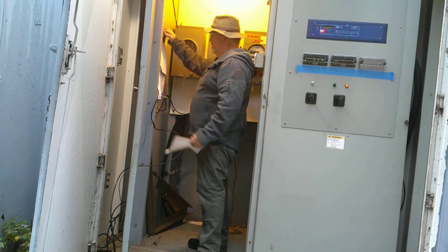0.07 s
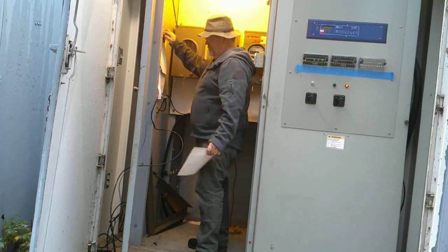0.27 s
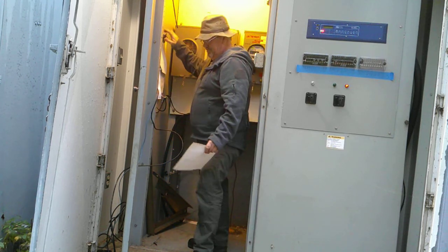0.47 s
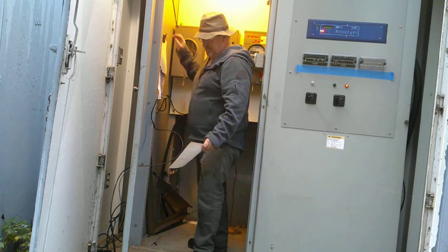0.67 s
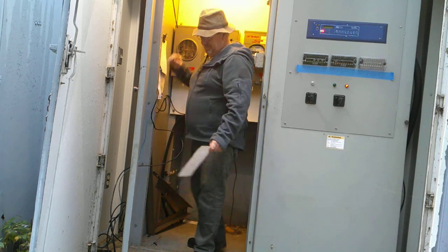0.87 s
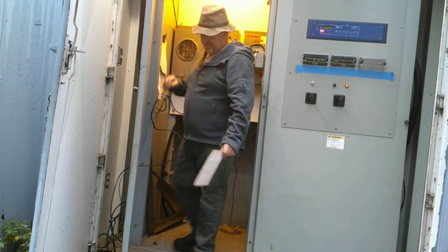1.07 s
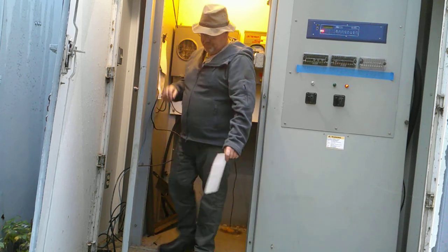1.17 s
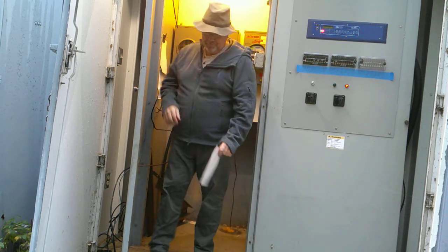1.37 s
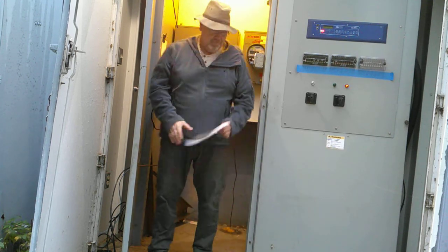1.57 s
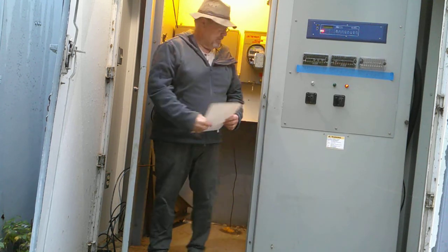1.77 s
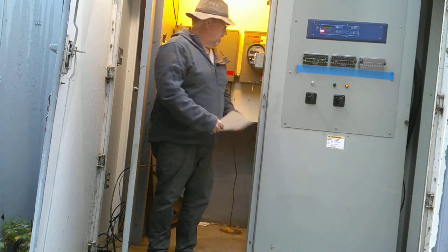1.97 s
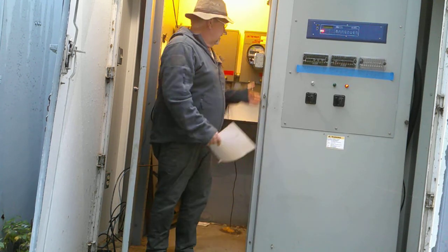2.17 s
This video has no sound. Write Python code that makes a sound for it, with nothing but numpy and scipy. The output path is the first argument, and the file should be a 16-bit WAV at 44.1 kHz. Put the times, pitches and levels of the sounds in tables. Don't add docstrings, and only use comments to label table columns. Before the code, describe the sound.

An even machine whirr with a faint mains buzz fills a hard-walled equipment room. Sharp papery snaps cluster in the first second, followed by grainy rustles and foot scuffs near a muffled-top microphone in the doorway.

```python
import sys
import numpy as np
from scipy import signal
from scipy.io import wavfile

SR = 44100
rng = np.random.default_rng(int(sys.argv[2]) if len(sys.argv) > 2 else 0)


def gain_from_db(level_db):
    decades = np.asarray(level_db, float) / 20
    return 10 ** decades


def file_out(sig):
    cols = np.atleast_2d(sig).T
    lim = np.clip(cols, -1, 1)
    pcm = np.round(lim * 32767).astype(np.int16)
    wavfile.write(sys.argv[1], SR, pcm)


N = 97284


def rms_one(x):
    return x / np.sqrt(np.mean(x ** 2) + 1e-20)


def drift(rate_hz):
    r = np.exp(-2 * np.pi * rate_hz / SR)
    noise = rng.standard_normal(N + SR)
    return rms_one(signal.lfilter([1], [1, -2 * r, r * r], noise)[SR:])


def band(low_hz, high_hz):
    sos = signal.butter(2, [low_hz, high_hz], "band", fs=SR, output="sos")
    return rms_one(signal.sosfilt(sos, rng.standard_normal(N + 4096))[4096:])


def peak(x, hz, width_hz, db):
    a, w = gain_from_db(db / 2), 2 * np.pi * hz / SR
    k = np.sin(w) * width_hz / hz / 2
    over = [1 + k * a, -2 * np.cos(w), 1 - k * a]
    under = [1 + k / a, -2 * np.cos(w), 1 - k / a]
    return signal.lfilter(over, under, x)


# (frequency [Hz], density [dB per Hz])
RUSH_COLOUR = [(25, -18.5), (90, -15.5), (200, -8), (450, -4), (900, 1), (2500, -2), (4000, -6.5),
               (9000, -15)]


def water_and_air_rush():
    level_db, patchy_db = -34.5, 1
    hz, density_db = np.transpose(RUSH_COLOUR)
    edges = 20 * 2 ** (np.arange(28) / 3)
    flicker = [drift(11.0) for _ in range(4)]
    total = np.zeros(N)
    for k, (low, high) in enumerate(zip(edges, edges[1:])):
        colour_db = np.interp(np.log(low * high) / 2, np.log(hz), density_db)
        gain = gain_from_db(colour_db + patchy_db * flicker[k % 4])
        total += np.sqrt(high - low) * band(low, high) * gain
    return gain_from_db(level_db) * rms_one(total)


def rotor_whine():
    centre_hz, width_hz = 458, 18
    return gain_from_db(-58) * band(centre_hz - width_hz / 2, centre_hz + width_hz / 2)


# (multiple of the hum [1], level [dB rms])
HUM_TONES = [(1, -61), (2, -54), (3, -54), (5, -44.5), (6, -46), (7, -52), (8, -44), (9, -51.5), (10, -54),
             (11, -58), (12, -60)]


def core_hum():
    hum_hz, waver_db = 120.02, 0.3
    spread_rad = 1.74
    t = np.arange(N) / SR
    total = np.zeros(N)
    for multiple, db in HUM_TONES:
        level = np.sqrt(2) * gain_from_db(db + waver_db * drift(6.0))
        phase = 2 * np.pi * hum_hz * round(multiple) * t + spread_rad * round(multiple) ** 2
        total += level * np.sin(phase)
    return total


# (start [s], length [s], level [dB], centre [Hz], band edge over centre [ratio])
SCUFF_EVENTS = [(0.325, .05, -38, 1400, 1.25), (0.335, .08, -39, 2650, 1.1), (1.82, .17, -39, 2300, 1.5),
                (1.915, .055, -44, 6200, 1.12), (0.32, .11, -48, 6300, 1.2), (0.34, .1, -46, 1000, 1.3),
                (0.58, .04, -42, 1500, 1.3), (0.86, .14, -50, 6300, 1.2), (1.14, .1, -43, 1500, 1.5),
                (1.44, .1, -44, 1100, 1.4), (1.63, .14, -42, 2200, 1.4), (1.74, .12, -40, 1450, 1.2),
                (1.73, .09, -49, 6100, 1.15), (1.68, .33, -45, 4600, 1.7), (1.76, .12, -42, 2900, 1.3),
                (1.76, .1, -43, 800, 1.25), (1.89, .1, -48, 6200, 1.2), (1.9, .1, -42, 1200, 1.3),
                (2.02, .1, -43, 2300, 1.2), (2.06, .1, -56, 200, 1.2), (2.14, .1, -40, 900, 1.3)]


def scuffs():
    grain_db, grain_hz = 3, 110
    t = np.arange(N) / SR
    total = np.zeros(N)
    for start, length, db, hz, width in SCUFF_EVENTS:
        swell = np.sin(np.pi * np.clip((t - start) / length, 0, 1)) ** 0.49
        level = gain_from_db(db + grain_db * drift(grain_hz))
        edge = max(width, 1.05)
        total += level * swell * band(hz / edge, hz * edge)
    return total


# (delay [s], level [dB])
WALL_ECHOES = [
    (0, 0),
    (.0055, -6),
    (.0085, -7),
    (.018, -9),
]


def snap_shape(age, t60):
    rise_s, tail_db = 0.0015, -6
    power = gain_from_db(2 * tail_db - 120 * np.maximum(age, 0) / t60) * np.clip(age / rise_s, 0, 1)
    for delay, db in WALL_ECHOES:
        u = np.clip((age - delay) / rise_s, 0, 50)
        power = power + gain_from_db(2 * db) * (u * np.exp(1 - u)) ** 3
    return np.sqrt(power)


# (time [s], peak [dB], body against crack [dB], crack centre [Hz], dying time [s])
SNAP_EVENTS = [
    (0.001, -29.5, -4.5, 6200, 0.39),
    (0.238, -41.5, -1, 6940, 0.18),
    (0.567, -29, -3.5, 5250, 0.32),
    (0.7498, -24.5, -8, 6800, 0.31),
    (0.8845, -31.5, -4, 7200, .22),
    (0.934, -30.5, -19, 7800, 0.12),
    (0.9551, -32.5, -9, 6800, 0.25),
    (1.109, -31.5, -13, 8300, .06),
    (1.654, -41, -14, 5800, 0.23),
    (2.079, -39, 1, 6000, 0.19),
]


def paper_snaps():
    body_lag_s, crack_width = 0.003, 1.6
    t = np.arange(N) / SR
    body_noise = band(1970, 2950)
    total = np.zeros(N)
    for start, db, body_db, hz, t60 in SNAP_EVENTS:
        age = t - start
        crack = snap_shape(age, t60) * band(hz / crack_width, hz * crack_width)
        body = gain_from_db(body_db) * snap_shape(age - body_lag_s, t60) * body_noise
        fade = gain_from_db(-40 * np.maximum(age, 0) / t60 / 2)
        total += gain_from_db(db) * (crack + body) * fade
    return total


def scene():
    machines = core_hum() + rotor_whine() + water_and_air_rush()
    return (machines + paper_snaps() + scuffs())[None]


# (frequency [Hz], width [Hz], level [dB])
HOUSING_PEAKS = [
    (4700, 1170, -9.5),
    (6380, 1820, 4.5),
    (7950, 800, -11),
]


def microphone(sound):
    for hz, width_hz, db in HOUSING_PEAKS:
        sound = peak(sound, hz, width_hz, db)
    sound = signal.sosfilt(signal.butter(6, 7730, fs=SR, output="sos"), sound)
    steep_edge = signal.cheby2(10, 50, 9045 * 1.047, fs=SR, output="sos")
    return signal.sosfilt(steep_edge, sound)


def low_pass(x):
    return signal.sosfilt(signal.butter(12, 9040, fs=SR, output="sos"), x)


def record(dry):
    mix = microphone(dry)
    return low_pass(mix)


dry = scene()
out = record(dry)
file_out(out)
```